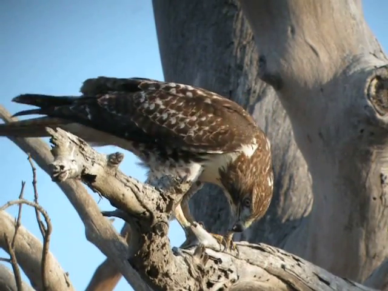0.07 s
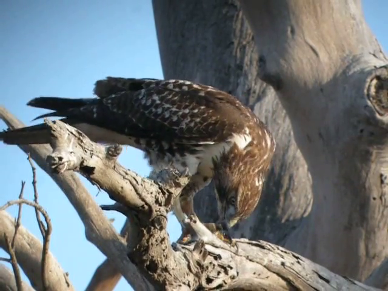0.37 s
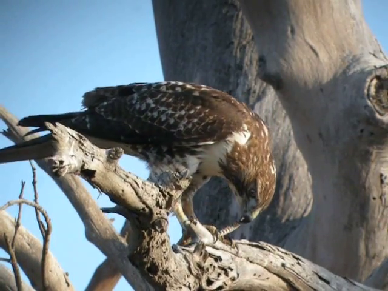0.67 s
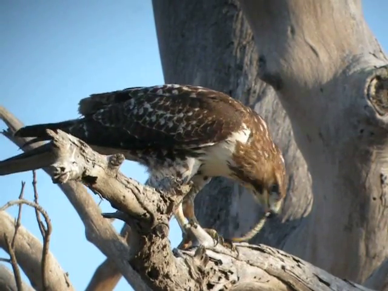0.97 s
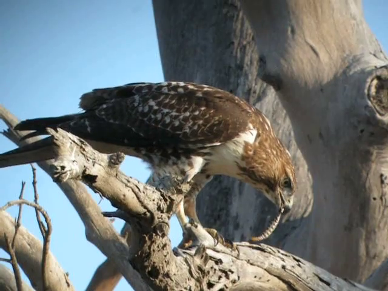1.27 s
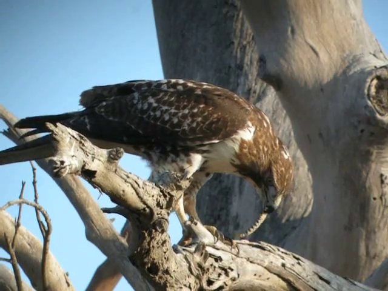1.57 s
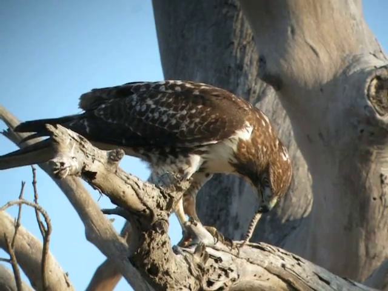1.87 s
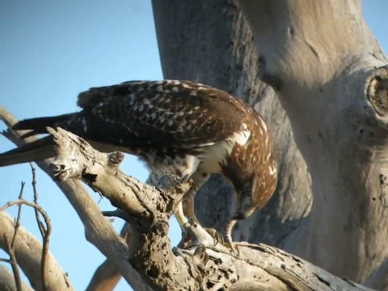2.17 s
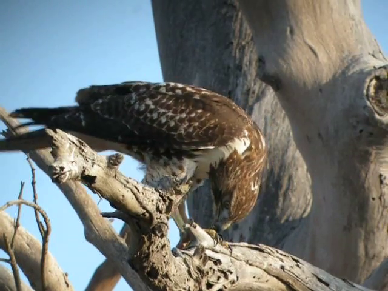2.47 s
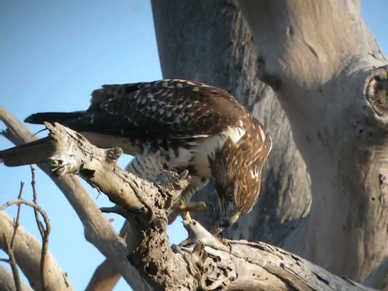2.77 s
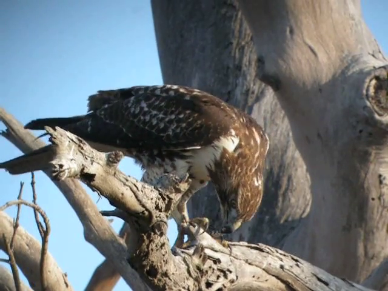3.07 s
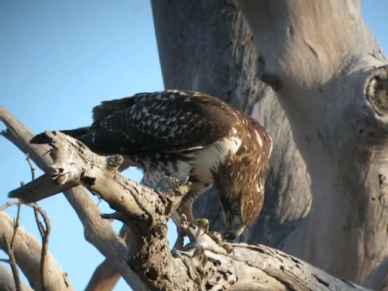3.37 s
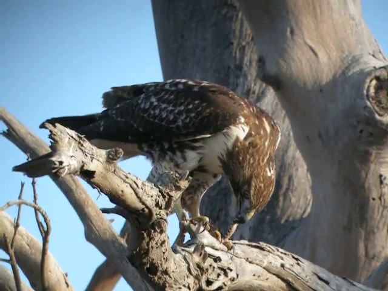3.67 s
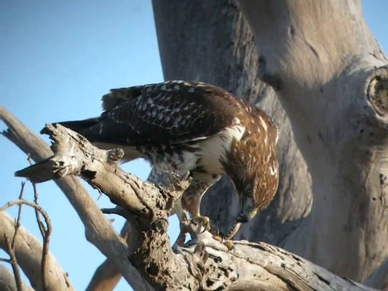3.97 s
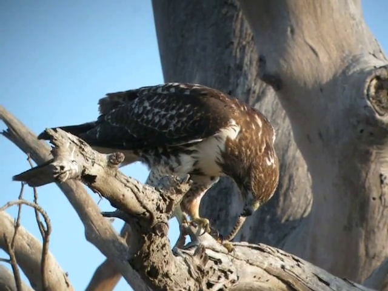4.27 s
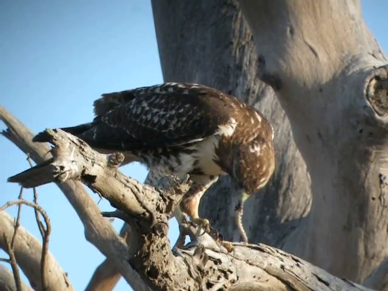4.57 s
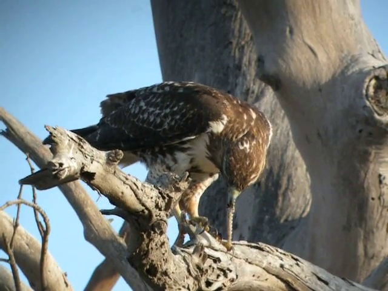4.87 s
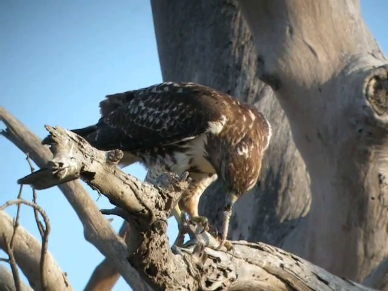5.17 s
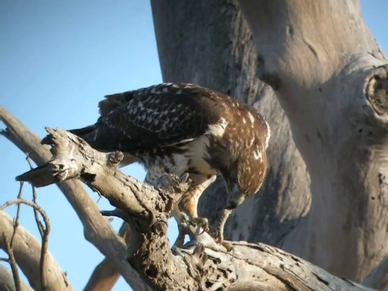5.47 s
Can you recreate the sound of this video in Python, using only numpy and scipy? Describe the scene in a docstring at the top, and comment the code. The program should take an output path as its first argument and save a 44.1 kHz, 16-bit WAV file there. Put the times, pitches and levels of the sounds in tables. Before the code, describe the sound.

A steady, quiet wash of distant traffic fills the whole five and a half seconds outdoors. One engine drones within it, wavering and gradually fading, and brief whines rise around 1 second and between 2.8 and 4.5 seconds. A feeding hawk tears at its prey with very faint crackles near 0.4, 1.3 and 2 seconds. Its beak makes a quick run of small dry ticks from 1.8 to 2.1 seconds and one more at 2.8. Small birds chirp faintly far away, around 1.1 seconds, 2.3 to 2.6, 3.2 to 4, and near 5. A light breeze rumbles on the microphone, puffing most near the end. A hand softly bumps the camera at 2.5 and 3.3 seconds. From 5.4 seconds comes a rapid cluster of bumps, with one hard knock just before 5.6, by far the loudest sound. Everything has little treble.

```python
"""First comes the wash of far traffic, with one engine droning and brief whines from engine and tyres.
A hawk feeds on a dead tree: its beak makes faint ticks, and the prey crackles as it tears.
Small birds chirp in the distance and a breeze rumbles on the microphone. All of it has little treble.
At the end a hand moves the camera: soft bumps, then one hard knock."""
import sys
import numpy as np
from scipy import signal
from scipy.io import wavfile

SR = 44100
rng = np.random.default_rng(int(sys.argv[2]) if len(sys.argv) > 2 else 0)


def master_out(mix):
    """Clip the mix to full scale and print it as 16-bit PCM to the path in sys.argv[1]."""
    frames = np.transpose(np.atleast_2d(mix))
    ceiling = np.clip(frames, -1, 1)
    pcm = np.round(ceiling * 32767).astype(np.int16)
    wavfile.write(sys.argv[1], SR, pcm)


N = 247401

# How strong the road noise is from low to high: pitch_hz, relative_db
ROAD_SPECTRUM = [(30, -27), (60, -22), (100, -10.5), (200, -9.5), (340, -1.5), (470, -5), (610, -8),
                 (900, -4), (1400, -11.5), (1900, -11.5), (2600, -17.5), (3300, -20), (4000, -23.5)]
# The road's low roar over time: time_s, level_db
ROAD_ROAR = [(0, -38.5), (1.1, -37.5), (1.8, -38), (2.5, -38), (3.9, -38.5), (4.2, -38.5), (5.6, -38.5)]

def road(hiss_db, lull_db):
    """Many far vehicles blend into a low roar and a hiss that thins in a lull between them."""
    roar_db, = over_time(ROAD_ROAR)
    dip_db = lull_db * swell(peak_s=3.7, length_s=5.3)
    wash = shaped_noise(ROAD_SPECTRUM, waver_db=0.94)
    roar = butter(wash, 1300, "low", order=1)
    hiss = wash - roar
    return from_db(roar_db) * unit_power(roar) + from_db(hiss_db - dip_db) * unit_power(hiss)


# The engine swelling and fading: time_s, drone_db, overtones_db
ENGINE_LEVELS = [(0, -47, -55), (.38, -48, -67.5), (.58, -43, -52), (.85, -46.5, -56.5), (1.2, -42, -55),
                 (1.45, -49.5, -51), (1.9, -48, -53.5), (2.7, -50.5, -63), (3.1, -47, -55.5),
                 (3.4, -50.5, -58), (3.67, -55.5, -49.5), (4.05, -55, -66.5), (4.37, -58.5, -50),
                 (4.6, -59, -60), (5.6, -62.5, -62)]
# Its other tones: multiple_of_drone_pitch, relative_db (0.5 is the firing rate itself)
ENGINE_OVERTONES = [(.5, -13.5), (2, -5.5), (3, -2.5), (4, -2), (4.5, -6.5), (5, 3)]

def engine(drone_hz, sag_hz_per_s, waver_db, fading_db):
    """An engine's firing makes a slowly sinking hum, strongest at twice the firing rate; the air fades each
    tone in and out on its own."""
    drone_db, overtones_db = over_time(ENGINE_LEVELS)
    pitch_hz = drone_hz - sag_hz_per_s * np.arange(N) / SR
    phase = phase_of(pitch_hz * (1 + 0.0035 * drift(5.57)))
    out = from_db(drone_db + waver_db * drift(11.0)) * unit_power(np.sin(phase))
    for multiple, relative_db in ENGINE_OVERTONES:
        level_db = overtones_db + relative_db + fading_db * drift(2.2)
        out += from_db(level_db) * unit_power(np.sin(multiple * phase))
    return out


# Brief wavering tones from far traffic, engine and tyres: peak_s, length_s, pitch_hz, level_db
TRAFFIC_WHINES = [(1.04, 0.37, 324, -43.5), (2.8, 0.31, 378, -45), (3.16, 0.21, 438, -40),
                  (3.82, 0.48, 443, -40), (3.898, 0.41, 340, -45.5), (4.47, 0.33, 329.4, -44)]

def traffic_whines(wander_hz, flutter_db):
    """Engine overtones and rolling tyres make brief wavering tones that swell and fade."""
    out = np.zeros(N)
    for peak_s, length_s, pitch_hz, level_db in TRAFFIC_WHINES:
        tone = np.sin(phase_of(pitch_hz + wander_hz * drift(24.2)))
        out += from_db(level_db + flutter_db * drift(7.1)) * swell(peak_s, length_s) * tone
    return out


# The hawk's beak snapping at the prey: start_s, peak_db
BEAK_TICKS = [(1.8187, -31.5), (1.8665, -38), (1.891, -33.5), (1.928, -35.5), (1.9805, -31), (2.0295, -32),
              (2.054, -40), (2.0845, -33.5), (2.848, -32)]

def beak(fade_s):
    """Each small dry snap is a sharp crack with a brief crackle behind it."""
    t, out = np.arange(SR // 30) / SR, np.zeros(N)
    crack = t == 0
    for start_s, peak_db in BEAK_TICKS:
        crackle = 0.17 * rng.standard_normal(len(t)) * from_db(-60 * t / fade_s)
        snap = butter(crack + crackle, [2250, 3600], "band")
        add(out, start_s, from_db(peak_db) * snap / np.abs(snap).max())
    return out


# The hawk pulling at the prey: peak_s, length_s, level_db
BEAK_PULLS = [(.3, .12, -57), (0.438, .07, -53), (1.333, 0.039, -48.5), (1.875, 0.092, -56),
              (2.07, 0.13, -55)]

def tearing(fibres_per_s, spread_db):
    """Each pull breaks many tiny fibres of uneven size, making a soft crackle."""
    sizes = from_db(spread_db * np.minimum(rng.exponential(1, N), 4)) * rng.choice([-1, 1], N)
    breaks = rng.random(N) < fibres_per_s / SR
    crackle = butter(sizes * breaks, [2900, 4300], "band")
    pulls = sum(from_db(level_db) * swell(peak_s, length_s) for peak_s, length_s, level_db in BEAK_PULLS)
    return pulls * unit_power(crackle)


# A hand bumping the camera: start_s, peak_db, contact_s
HAND_BUMPS = [(2.479, -25, 0.0057), (3.338, -33, 0.009), (5.380, -23, 0.0033), (5.422, -20.5, 0.0057),
              (5.431, -35, 0.0052), (5.443, -18, 0.0058), (5.458, -19, 0.0043), (5.471, -22, 0.006),
              (5.512, -20, 0.0047), (5.52, -20, 0.0057), (5.5357, -13, 0.0037), (5.553, -21.5, 0.0015),
              (5.564, -18, 0.0048), (5.577, 1, 0.00028), (5.585, -20, 0.0028), (5.601, -20, 0.0046)]
# The tones its body rings with: pitch_hz, relative_db, fade_s (time to fall 60 dB)
CAMERA_TONES = [(180, -13.5, 0.012), (355, 6.5, 0.021), (630, 3.5, 0.014), (1547, -6.5, 0.0089),
                (2920, -0.5, 0.0032), (3860, -2, 0.0011)]

def camera_bumps():
    """Each push makes the camera ring briefly; only a very short contact wakes the high tones."""
    t, out = np.arange(SR // 20) / SR, np.zeros(N)
    ring = sum((-1) ** k * from_db(relative_db - 60 * t / fade_s) * np.sin(2 * np.pi * pitch_hz * t)
               for k, (pitch_hz, relative_db, fade_s) in enumerate(CAMERA_TONES))
    for start_s, peak_db, contact_s in HAND_BUMPS:
        push = np.sin(np.pi * np.minimum(t / contact_s, 1)) ** 2
        bump = butter(signal.fftconvolve(push, ring)[:len(t)], 150, "high")
        add(out, start_s, from_db(peak_db) * bump / np.abs(bump).max())
    return out


# Far birds' warbling notes: start_s, length_s, middle_hz, slide_hz, droop_hz (at both ends), level_db
BIRD_NOTES = [(1.106, 0.02, 3270, 224, 73, -49.5), (1.124, 0.014, 3680, 528, 0, -50),
              (1.172, 0.02, 2760, -250, 199, -54), (1.203, 0.029, 2870, 453, 60, -54),
              (2.391, 0.034, 2645, 58, 243, -48), (3.187, 0.055, 2725, 127, 296, -54),
              (3.355, 0.07, 2530, 262, 263.5, -54), (3.63, 0.08, 2660, 300, 327.5, -53),
              (3.798, 0.036, 2790, -480, 61, -49), (3.852, 0.029, 3030, 257, 170, -49.5),
              (3.881, 0.055, 3410, 559, -60, -55), (3.949, 0.048, 2580, 3.5, 119, -52.5),
              (4.017, 0.046, 2795, 0, 261, -52), (4.905, 0.095, 2500, -580, 161, -56)]
# A second bird's thin falling chirps: start_s, length_s, middle_hz, slide_hz, level_db
BIRD_CHIRPS = [(2.276, 0.018, 3860, -150, -56), (2.449, 0.015, 4000, -59.5, -57),
               (2.481, 0.016, 3810, -520, -55.5), (2.575, 0.026, 3570, -100, -57.5),
               (2.648, 0.019, 3950, -100, -61), (5.279, 0.059, 3770, -400, -58)]

def birds(quaver_share, echo_db):
    """Each note is a short sliding whistle, followed by a faint echo from the trees."""
    out, quaver = np.zeros(N), 1 + quaver_share * drift(140)
    chirps = [(*chirp, 0, level_db) for *chirp, level_db in BIRD_CHIRPS]  # no droop
    for start_s, length_s, middle_hz, slide_hz, droop_hz, level_db in list(BIRD_NOTES) + chirps:
        position = np.linspace(-1, 1, round(length_s * SR))
        pitch_hz = middle_hz + slide_hz * position / 2 - droop_hz * position ** 2
        pitch_hz *= quaver[round(start_s * SR):][:len(position)]
        whistle = signal.windows.tukey(len(position), .3) * np.sin(phase_of(pitch_hz))
        add(out, start_s, from_db(level_db) * unit_power(whistle))
    out *= from_db(2 * drift(50))  # the loudness flickers
    t = np.arange(SR // 3) / SR
    trees = rng.standard_normal(len(t)) * from_db(-60 * t / 0.094)
    echo = signal.fftconvolve(out, trees / np.linalg.norm(trees))[:N]
    return out + from_db(echo_db) * echo


# How strong the wind noise is from low to high: pitch_hz, relative_db
BREEZE_SPECTRUM = [(25, -25), (50, -13), (85, -2), (135, 0.5), (220, 0), (400, -31.5), (1000, -57.5)]
# Puffs of wind: peak_s, length_s, level_db
BREEZE_GUSTS = [(.72, 0.21, -51.5), (1.232, 0.13, -40.5), (2.163, 0.13, -46), (2.462, 0.15, -44.5),
                (2.802, 2.2, -45.5), (3.325, 0.17, -40), (5.5, 0.49, -35)]

def breeze(calm_db):
    """Air swirls at the microphone in a low rumble; gusts add their power to the calm flow."""
    gust_power = sum((from_db(level_db) * swell(peak_s, length_s)) ** 2
                     for peak_s, length_s, level_db in BREEZE_GUSTS)
    return np.sqrt(from_db(calm_db) ** 2 + gust_power) * shaped_noise(BREEZE_SPECTRUM, waver_db=1.0)


def from_db(db):
    """Turn decibels into a number to multiply by."""
    return 10 ** (np.asarray(db) / 20)


def unit_power(x):
    """Scale a sound so its average power is 1."""
    return x / np.sqrt(np.mean(x ** 2) + 1e-20)


def phase_of(pitch_hz):
    """How far a tone has turned at each sample, in radians."""
    return 2 * np.pi * np.cumsum(pitch_hz) / SR


def over_time(rows):
    """Join a table's points with straight lines, one curve for each column after the time."""
    time_s, *columns = np.transpose(rows)
    return [np.interp(np.arange(N) / SR, time_s, column) for column in columns]


def butter(x, hz, kind, order=2):
    """Keep the lows, the highs or a band; a higher order cuts more sharply."""
    return signal.sosfilt(signal.butter(order, hz, kind, fs=SR, output="sos"), x)


def add(out, start_s, sound):
    """Mix a short sound in at start_s."""
    at = round(start_s * SR)
    out[at:at + len(sound)] += sound[:max(N - at, 0)]


def swell(peak_s, length_s):
    """A rounded rise from 0 to 1 and back."""
    return np.cos(np.pi * np.clip((np.arange(N) / SR - peak_s) / length_s, -.5, .5))


def drift(rate_hz):
    """A smooth random wobble, about 1 in size; a higher rate wobbles faster."""
    step = 40  # samples between random points
    memory = np.exp(-2 * np.pi * rate_hz * step / SR)
    noise = rng.standard_normal(N // step + 2002)
    slow = signal.lfilter([1], [1, -2 * memory, memory * memory], noise)[2000:]
    return np.interp(np.arange(N) / step, np.arange(len(slow)), unit_power(slow))


def shaped_noise(spectrum, waver_db):
    """Noise in bands a third of an octave wide, each swelling a little on its own."""
    points_hz, points_db = np.transpose(spectrum)
    edges_hz = 22 * 2 ** (np.arange(24) / 3)
    white, out = rng.standard_normal((2, N)), 0
    for k, (low, high) in enumerate(zip(edges_hz, edges_hz[1:])):
        level_db = np.interp(np.log(low * high) / 2, np.log(points_hz), points_db)
        band = butter(white[k % 2], [low, high], "band")
        out = out + from_db(level_db + waver_db * drift(4.6)) * band
    return unit_power(out)


def scene():
    """Everything meets at one microphone."""
    traffic = road(hiss_db=-44, lull_db=1.5)
    traffic += engine(drone_hz=171.4, sag_hz_per_s=1.42, waver_db=2.0, fading_db=2.0)
    traffic += traffic_whines(wander_hz=9, flutter_db=2.0)
    hawk = beak(fade_s=0.017) + tearing(fibres_per_s=1300, spread_db=3.0)
    background = breeze(calm_db=-53) + birds(quaver_share=0.018, echo_db=-7)
    return (traffic + hawk + camera_bumps() + background)[None]


def record(dry):
    """Slow sampling mirrors the highest sounds upward; the treble is cut and the hardest peak clips."""
    sampler_hz, cutoff_hz = 8000, 5300
    mirror = 2 * np.cos(2 * np.pi * sampler_hz * np.arange(N) / SR)
    sampled = butter(dry, 4230, "low", order=12) * (1 + mirror)
    smooth = butter(sampled, 3880, "low", order=12)
    dull = signal.sosfilt(signal.cheby2(16, 50, cutoff_hz, fs=SR, output="sos"), smooth)
    return np.clip(dull, -1, 1)


dry = scene()
out = record(dry)
master_out(out)
```